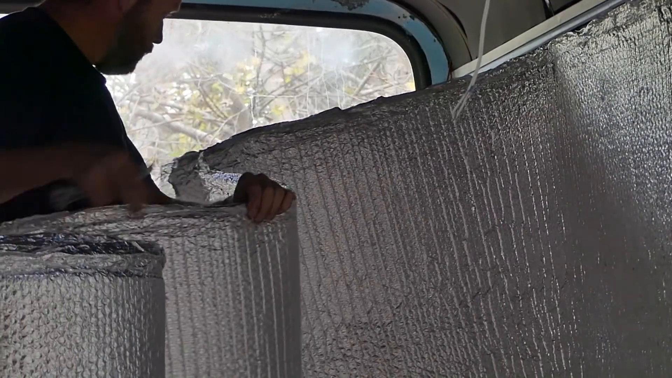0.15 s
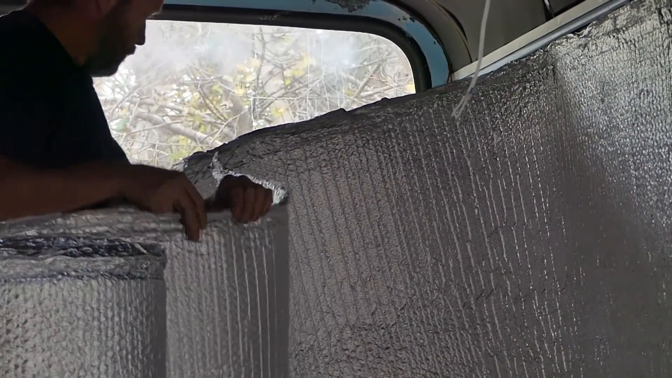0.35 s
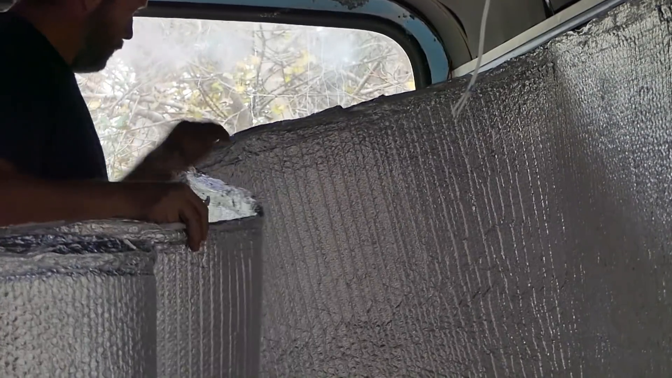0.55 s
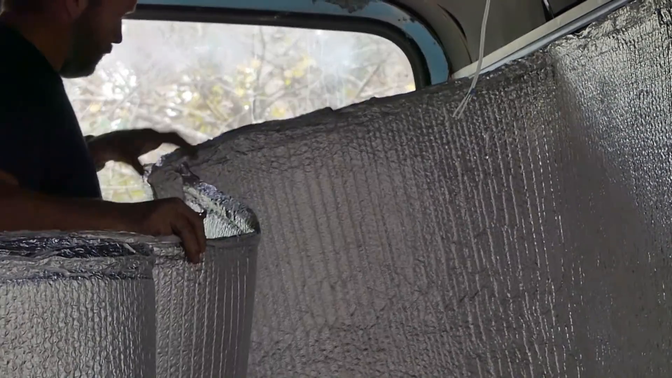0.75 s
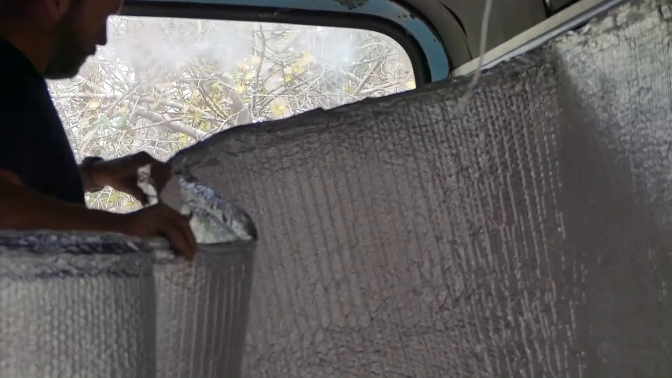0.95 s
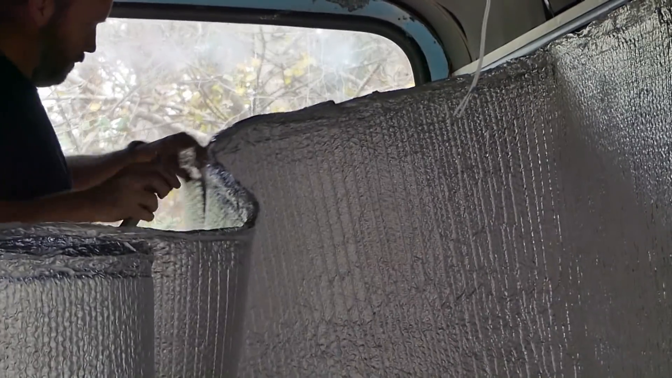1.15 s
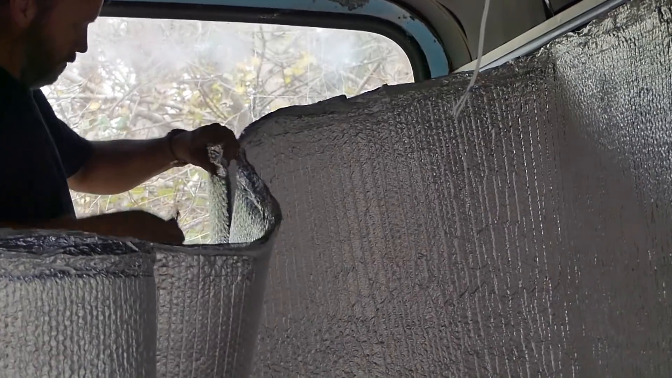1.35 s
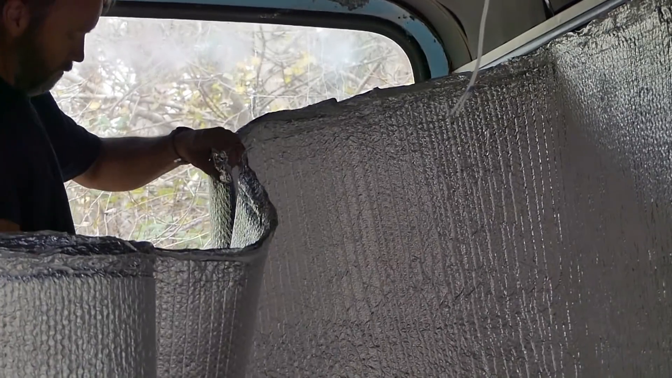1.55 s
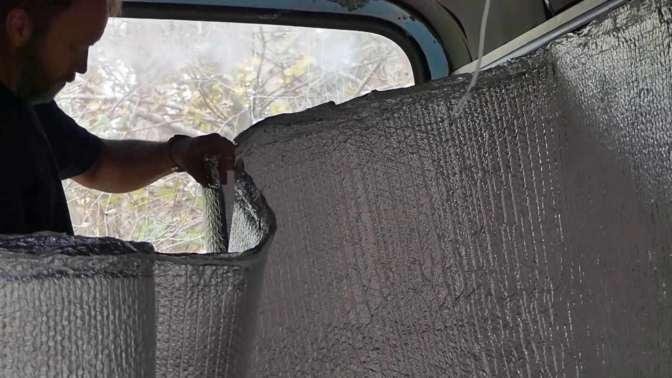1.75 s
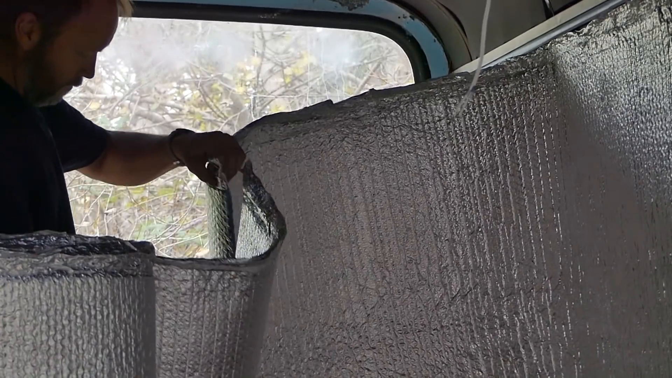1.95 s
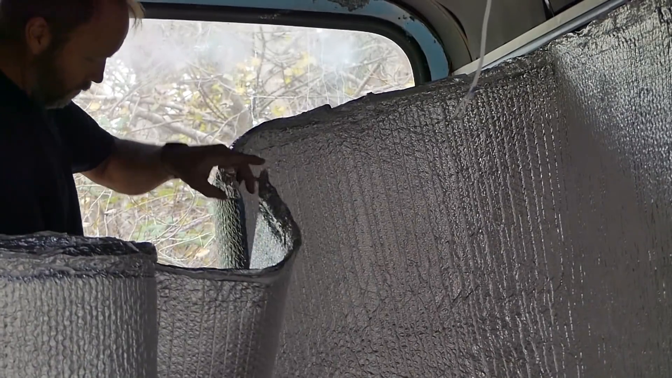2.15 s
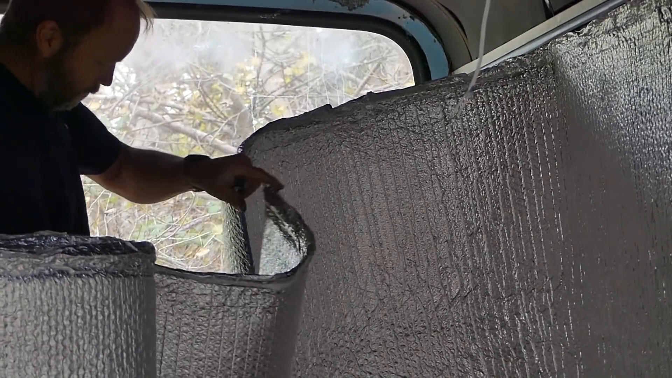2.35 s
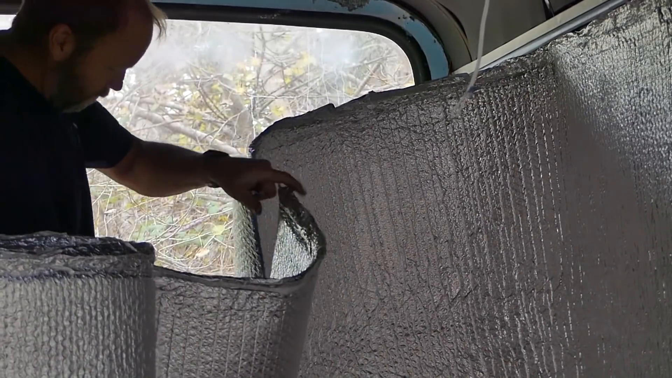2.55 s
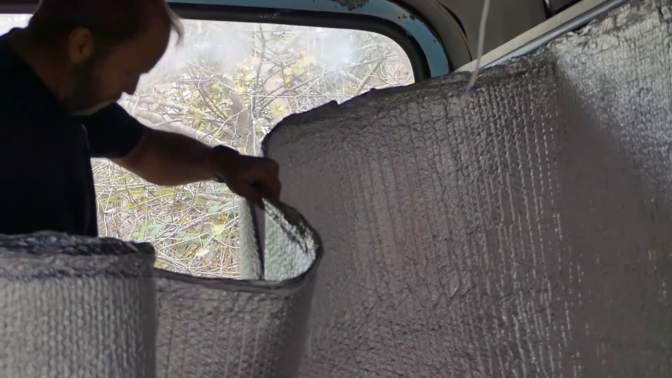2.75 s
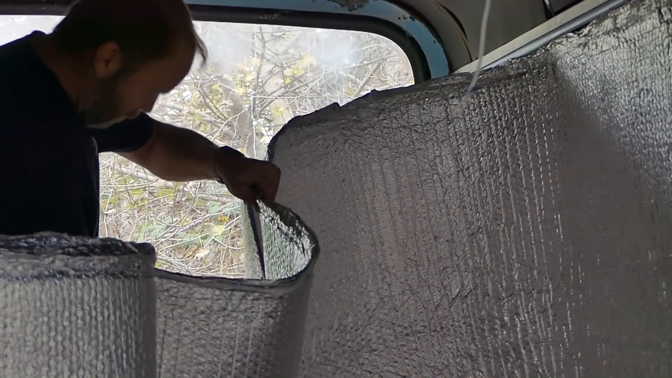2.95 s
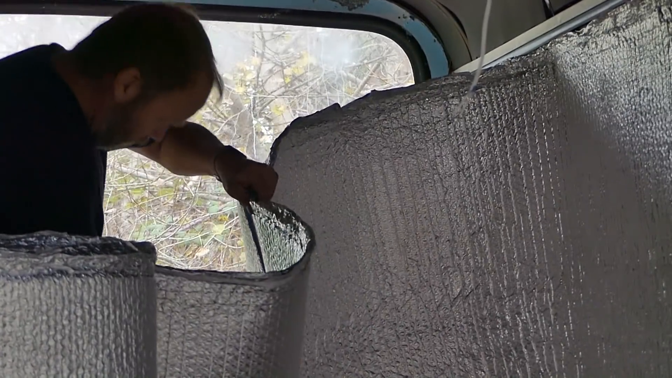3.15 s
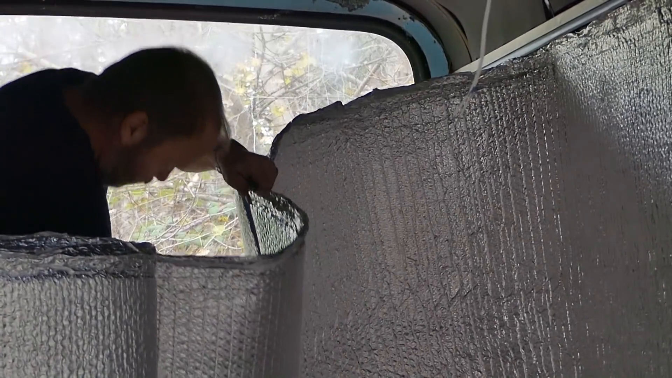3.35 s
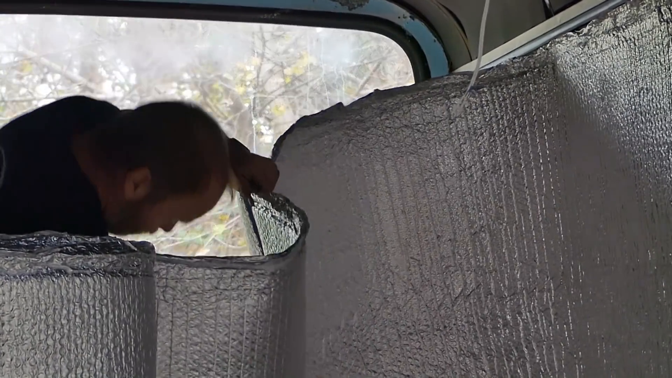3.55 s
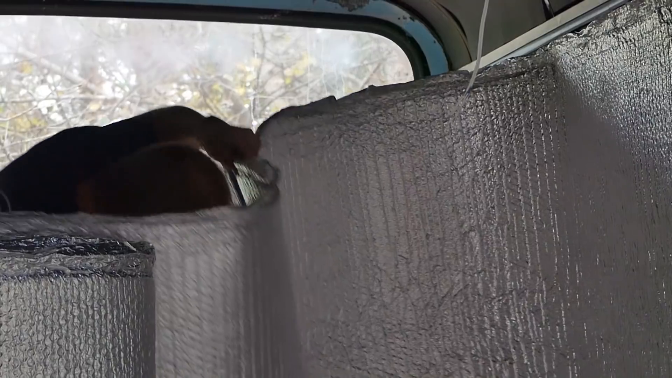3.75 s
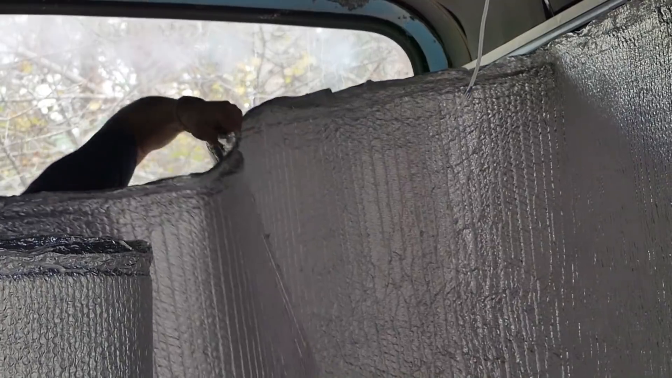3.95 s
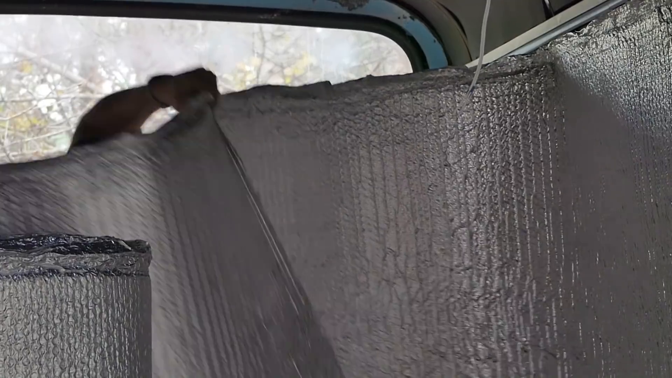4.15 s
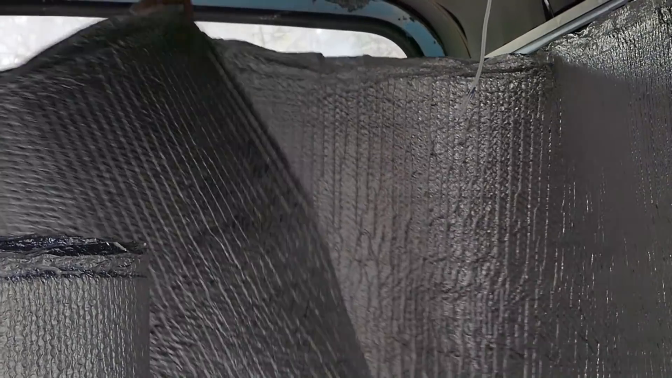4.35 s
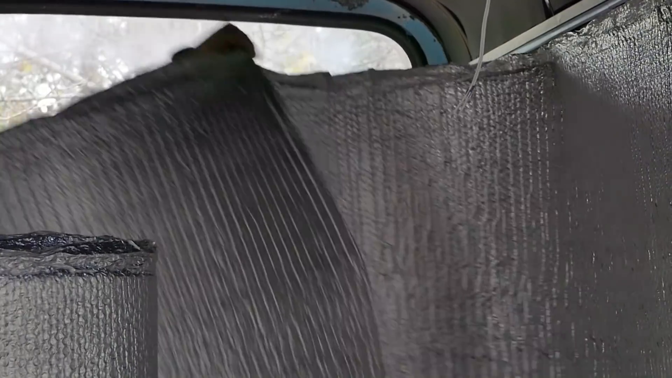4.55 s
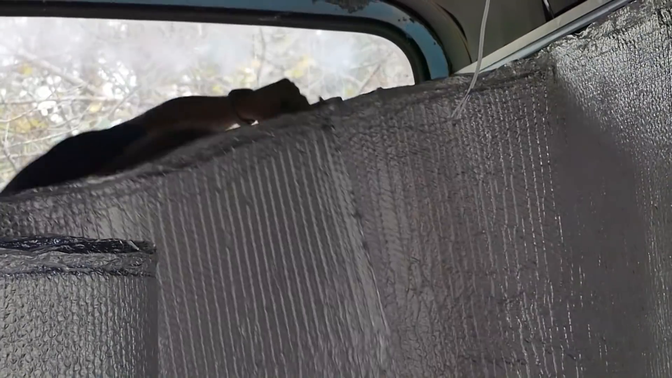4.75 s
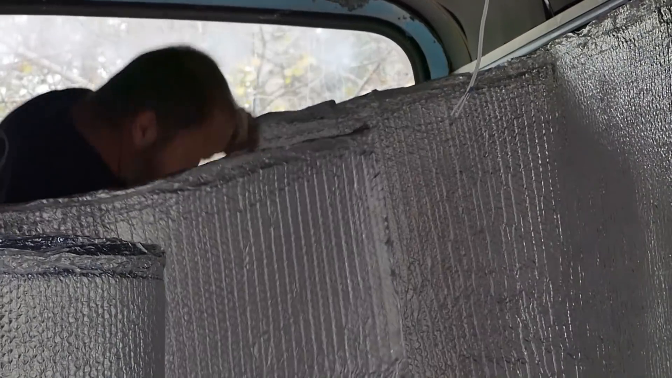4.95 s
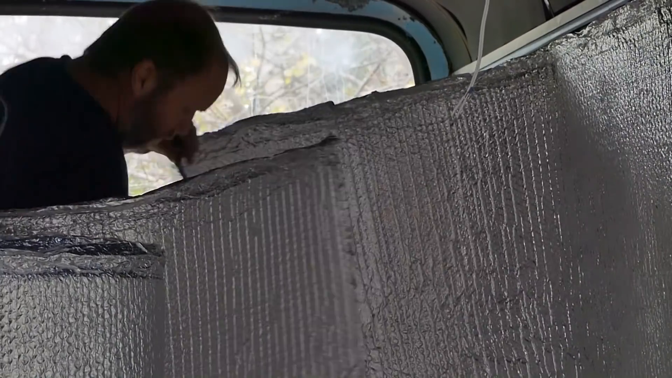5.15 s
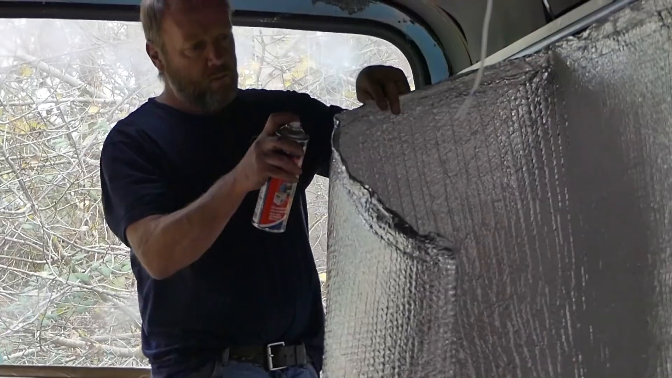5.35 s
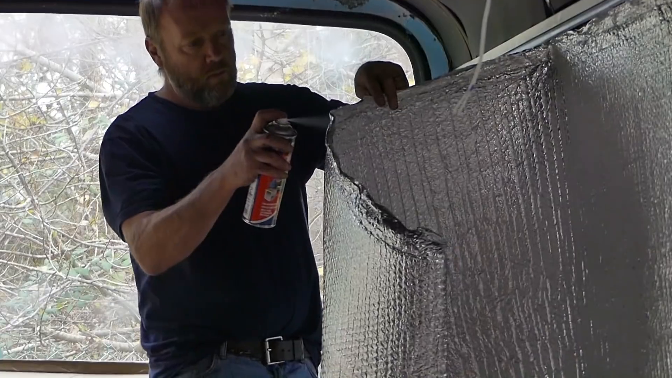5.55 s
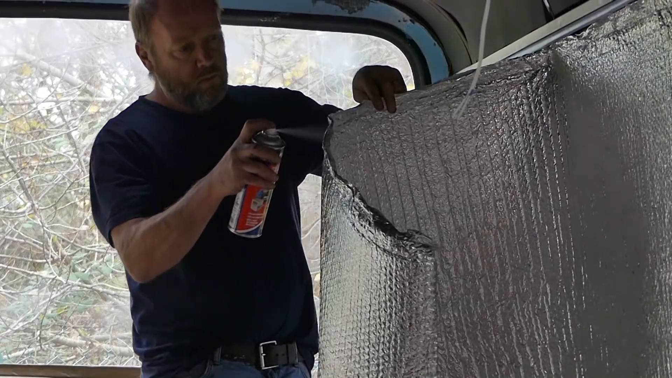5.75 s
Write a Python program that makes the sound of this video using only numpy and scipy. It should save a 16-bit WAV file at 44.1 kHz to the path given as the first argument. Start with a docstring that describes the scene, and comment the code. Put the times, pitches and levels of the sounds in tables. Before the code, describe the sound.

Inside a van, close by, hands stroke foil-faced bubble sheet: soft hissing slips, ticking wrinkles, low rustle. Midway a sharp snap opens three loud, crackling rasps with dull flaps and brief hoarse hums. Lighter rustling follows, then an abrupt cut to a smooth aerosol spray that holds to the end. Faint outdoor air lies beneath.

```python
"""Inside a van, over faint outdoor air, hands stroke a foil-faced bubble sheet against the wall.
From the start foil slips hiss, wrinkles tick and pressed bubbles rustle; soon the taut sheet hums at times,
panels buckle with dull flaps and creases snap as short ringing noise bursts.
From 3.2 s three hard drags rasp rows of bubbles over an edge, drumming the sheet and crackling the foil.
At 5.3 s an edit cuts from the handling to an aerosol can spraying smooth noise; the held sheet stirs once."""
import sys
import numpy as np
from scipy import signal
from scipy.fft import rfft, irfft
from scipy.io import wavfile
from scipy.ndimage import uniform_filter1d

SR = 44100
rng = np.random.default_rng(int(sys.argv[2]) if len(sys.argv) > 2 else 0)


def put_to_file(sound):
    """Save the sound as 16-bit audio at rate SR, in the file named by the first command-line argument."""
    columns = np.atleast_2d(sound).T  # one column per channel
    safe = np.clip(columns, -1, 1)
    whole_steps = np.round(safe * 32767)
    wavfile.write(sys.argv[1], SR, whole_steps.astype(np.int16))


N = 256220
TIME_S = np.arange(N) / SR

# Hand strokes over the sheet. Each row: start in seconds, time to release in seconds, rise in seconds,
# then relative levels in dB of foil sliding, bubbles pressed and whole sheet flexing.
STROKES = [ (-.03, .13, 0.023, -45.5, -44, -49), (0.12, 0.038, 0.029, -41, -37, -63),
           (0.18, 0.13, .04, -48, -48, -56), (0.317, 0.13, 0.17, -37, -38, -48),
           (0.463, 0.13, 0.015, -40.5, -51.5, -70), (0.602, 0.13, 0.025, -43, -42.5, -60),
           (0.706, 0.2, 0.063, -41, -35, -55.5), (0.909, 0.16, 0.069, -38.5, -35, -60),
           (1.135, 0.21, 0.045, -41.5, -52.5, -56), (1.356, 0.12, 0.046, -47.5, -47.5, -44.5),
           (1.466, 0.13, 0.044, -43, -43.5, -56), (1.62, 0.16, .03, -45, -48, -59),
           (1.735, 0.14, 0.021, -48.5, -55, -51), (1.90, 0.12, 0.066, -48, -43.5, -40.5),
           (2.021, 0.098, 0.027, -45.5, -51.5, -58), (2.162, 0.023, 0.022, -49, -56, -64),
           (2.204, 0.11, 0.087, -44, -46, -46), (2.307, 0.11, 0.077, -41, -47, -47),
           (2.454, 0.063, 0.047, -42, -54, -60), (2.596, 0.18, 0.12, -42, -48.5, -51),
           (2.756, .11, 0.059, -44.5, -41, -44), (2.863, 0.12, 0.029, -46, -67, -69),
           (2.967, 0.21, 0.068, -41, -67, -51), (3.139, 0.021, 0.034, -34, -32, -45),
           (4, 0.06, 0.04, -37.5, -34, -38), (4.364, 0.11, 0.042, -37, -42, -46),
           (4.482, 0.21, .04, -43.5, -47, -55), (4.615, 0.19, .1, -36, -46.5, -60),
           (4.82, 0.2, 0.035, -42, -47.5, -66), (5.04, .08, .04, -45, -53, -63),
           (5.107, 0.088, 0.014, -42, -44.5, -49), (5.21, 0.085, 0.054, -42, -47, -69), ]
# Hums of the taut sheet. Each row: start in seconds, time to release in seconds, level in dB,
# starting pitch in Hz.
HUMS = [(0.153, 0.034, -38.5, 360), (.79, 0.092, -43, 480), (1.039, 0.039, -37.5, 559),
        (4.255, 0.098, -31.5, 377), (4.325, 0.035, -24.5, 363), (4.40, .05, -40, 354),
        (4.689, 0.092, -33.5, 383.8)]
# Buckling panels. Each row: start in seconds, relative level in dB, upper edge in Hz, decay in seconds.
BUCKLES = [(.155, -28, 1400, 0.018), (0.718, -26, 2000, 0.018), (3.158, -23, 860, 0.018),
           (3.22, -19.5, 1000, 0.012), (3.549, -20.5, 1300, 0.019), (4.343, -14.5, 1390, 0.013),
           (4.751, -20, 490, 0.032), (5.129, -20.5, 1750, 0.017)]
# Snapping creases. Each row: start in seconds, relative level in dB, centre in Hz, decay in seconds, Q.
SNAPS = [(0.156, -39, 4260, 0.017, 1.6), (0.721, -19, 5200, 0.0035, 3.3), (0.727, -16.5, 4900, 0.007, 3.6),
         (1.042, -27.5, 10000, .008, 2.8), (1.277, -35.5, 900, 0.023, 17),
         (1.418, -26.5, 4040, 0.0052, 6.4), (1.748, -37, 11100, 0.02, 1.7),
         (1.843, -34.5, 2930, 0.013, 4.9), (2.295, -43, 5000, 0.0077, 2), (2.927, -32.5, 12700, 0.01, 3),
         (3.209, -8.5, 3330, 0.0066, 29), (3.266, -12, 3550, 0.022, 2.9), (3.344, -16, 3170, 0.078, 1.4),
         (3.559, -22, 3020, 0.0092, 1.9), (4.155, -16, 3500, 0.0061, 2), (4.32, -16, 3570, .02, 2.2),
         (4.343, -11.5, 2150, 0.0082, 3.3)]
# Hard drags along the wall. Each row: start in seconds, time to release in seconds, rise in seconds,
# then relative levels in dB of the sheet's body and the foil's crackle.
DRAGS = [(3.192, 0.27, .075, -20, -25), (3.542, 0.38, 0.048, -21.5, -24), (4.096, 0.23, 0.047, -20, -25.5)]
# Resonances of sheet and wall. Each row: centre in Hz, width in Hz, lift in dB before each layer's scaling.
SHEET_RESONANCES = [(186, 30, 4), (436, 18, 5), (499, 22, 2), (570, 26, 4.5), (744, 22, 3.5), (832, 26, 4),
                    (964, 18, 3.5), (1078, 40, 5), (1237, 35, 3.5), (1503, 24, 4), (1857, 27, 4.5),
                    (2025, 22, 6), (3270, 60, 2.5), (3362, 40, 2.5)]

# Colours of the layers. Each row: frequency in Hz, relative density in dB per Hz.
AIR_COLOUR = [(30, -22), (80, -14.5), (160, -3.5), (400, -1.5), (900, -5.5), (1700, -10), (4500, -9.5),
              (8000, -14.5), (15500, -11.5)]
SLIDE_COLOUR = [(500, -19.5), (1400, -14.5), (2000, -10), (2600, -8.5), (3100, -2.5), (4100, -1),
                (6800, -5.5), (7600, -10.5), (9800, -8), (12000, -15), (15500, -22.5)]
PRESS_COLOUR = [(30, -29), (75, -32), (130, -4.5), (265, -7.5), (350, -0.5), (490, -1), (720, -6.5),
                (1050, -6), (1500, -12), (2200, -9), (4500, -28.5)]
FLEX_COLOUR = [(25, -16), (60, -29), (90, -16), (130, 1), (210, -7.5), (300, -4.5), (600, -21)]
WRINKLE_COLOUR = [(1000, -23), (3500, -2), (7000, -5), (12000, -3), (15500, -9)]
CRACKLE_COLOUR = [(1000, -22), (1900, 2), (2700, 0), (3700, 0), (5000, -3.5), (6300, -6), (7700, -11.5),
                  (10000, -9.5), (12500, -16), (15500, -24.5)]
SPRAY_COLOUR = [(30, -48), (100, -17), (400, -12.5), (1300, -9), (1750, -3), (2350, -10), (3050, 0.5),
                (4200, -4), (6000, 0), (8000, -4), (9700, 2), (12600, 2.5), (14200, -0.5), (15600, -4)]
# Body colours, one table per drag. Each row: frequency in Hz, relative density in dB per Hz.
DRAG_COLOURS = [
    [(40, -59), (80, -40), (110, -16), (190, -6.5), (280, -11), (350, -2.5), (560, -5), (720, -6),
     (900, -12.5), (1070, -8.5), (1400, -17.5), (2200, -25), (3400, -39)],
    [(40, -25), (80, -26), (110, -6), (180, 0.5), (230, 5.5), (270, 1), (450, 4), (720, -2.5), (1000, -1),
     (1400, -8.5), (2200, -23), (3400, -36)],
    [(40, -46), (80, -16), (135, -18.5), (175, -1.5), (260, -2), (380, -2), (620, -5.5), (850, -7.5),
     (1100, -11.5), (1400, -9.5), (2100, -11), (3400, -35)],
]

# Stereo widths of air and sheet. Each row: frequency in Hz, side minus mid in dB.
AIR_SIDE = [(60, -1), (400, 7), (1500, 4.5), (4000, -12), (15000, -8)]
NEAR_SIDE = [(60, -15), (250, -21.5), (1300, -13.5), (4400, -15.5), (7500, -18.5), (9500, -8), (15000, -4)]
# Side level of the jet as audio coding leaves it, nearly mono at 3-8 kHz.
# Each row: frequency in Hz, side minus mid in dB.
CODED_JET_SIDE = [(60, -11), (1500, -11), (3100, -44), (7800, -51), (8600, -11), (15000, -8)]

STROKE_FADE_DB_PER_S, CUT_S = 154, 5.315
WRINKLES_PER_S, WRINKLE_DB = 49, -9.5
HUM_RISE_S, HUM_FADE_DB_PER_S, HUM_SAG_HZ_PER_S = 0.037, 190, 90
BODY_FADE_DB_PER_S = 176
CRACKLE_SAG_DB_PER_S, CRACKLE_FADE_DB_PER_S, CRACKLE_ARCH_DB = 8.5, 170, 1
SPRAY_START_S, SPRAY_RISE_S, SPRAY_OPENING_POWER = 5.39, 0.16, 1.42
SPRAY_DB, SPRAY_SAG_DB_PER_S = -26, 4.5
JET_ECHO_S, JET_ECHO_GAIN = 0.00272, 0.15
STIR_START_S, STIR_LENGTH_S, STIR_RISE_S, STIR_DB = 5.635, 0.052, 0.033, -38
NOTCH_HZ, NOTCH_Q, BASS_CUT_HZ, CUTOFF_HZ = 7500, 60, 60, 15650


def amp(db):
    """Amplitude ratio of a level in dB."""
    return 10 ** (np.asarray(db) / 20)


def unit(x):
    """Scales to an rms of one."""
    return x / np.sqrt(np.mean(x ** 2) + 1e-20)


def read(points, hz):
    """Interpolates a spectrum on a log-frequency axis."""
    f, value = np.transpose(points)
    return np.interp(np.log(hz + 1), np.log(f + 1), value)


def add(mix, start_s, sound):
    """Adds a sound in place, cut at the end of the mix."""
    part = mix[:, round(start_s * SR):][:, :sound.shape[1]]
    part += sound[:, :part.shape[1]]


def colour(x, gain_db, size=8192):
    """Causal minimum-phase filter of unit energy, shaped by gain_db(Hz)."""
    hz = abs(np.fft.fftfreq(size, 1 / SR))
    log_gain = np.log(amp(gain_db(hz)) + 1e-5)
    spectrum = np.exp(np.conj(signal.hilbert(log_gain)))
    taps = np.fft.ifft(spectrum).real[:size // 2]
    taps /= np.linalg.norm(taps)
    return signal.oaconvolve(x, taps[None], axes=1)[:, :x.shape[1]]


def noise():
    """Two unrelated white noises."""
    return rng.standard_normal((2, N))


def spread(pair, side_db):
    """Uses two unrelated signals as mid and side to give left and right of a set width."""
    side_gain = amp(read(side_db, np.fft.rfftfreq(N, 1 / SR)))
    side = irfft(rfft(pair[1]) * side_gain, N)
    return np.array([pair[0] + side, pair[0] - side])


def van(x, wet_db, t60_s):
    """The foil-lined cabin throws the treble back as a short, dense spray of reflections."""
    t = np.arange(SR // 4) / SR
    arrivals = (rng.random((2, len(t))) < 3000 / SR) * (t > .002)
    taps = rng.standard_normal((2, len(t))) * arrivals * amp(-60 * t / t60_s)
    taps = signal.sosfilt(signal.butter(2, 1500, "high", fs=SR, output="sos"), taps)
    taps /= np.linalg.norm(taps, axis=1, keepdims=True)
    echo = signal.oaconvolve(x, taps, axes=1)[:, :N]
    return (x + amp(wet_db) * echo) / np.hypot(1, amp(wet_db))


def sheet_db(hz):
    """Lift that the sheet's resonances give to each frequency."""
    return sum(db / (1 + (2 * (hz - f) / width) ** 2) for f, width, db in SHEET_RESONANCES)


def wander(hz):
    """Slow chance of rms one, mostly below the given rate."""
    lowpass = 1 / (1 + (np.fft.rfftfreq(N, 1 / SR) / hz) ** 4)
    return unit(irfft(rfft(rng.standard_normal(N)) * lowpass, N))


def ticks(per_s, spread_db, clump_db, clump_hz, facet_db, facet_hz):
    """Two trains of tiny slips, uneven and bunched; each bending facet favours its own pitch for a moment."""
    size = amp(spread_db * np.minimum(rng.exponential(1, N), 4))
    slips = size * (rng.random(N) < per_s / SR) * amp(clump_db * wander(clump_hz))
    signed = slips * rng.choice([-1., 1.], (2, N))
    hz, _, z = signal.stft(signed, nperseg=256, fs=SR)
    facets = uniform_filter1d(rng.standard_normal(z.shape[1:]), size=5, axis=1)
    keep = np.exp(-hz[1] / facet_hz)  # neighbouring pitches swell together
    facets = unit(signal.lfilter([1], [1, -keep], facets, axis=0))
    sound = signal.istft(z * amp(facet_db * facets), nperseg=256)[1]
    return unit(sound[:, :N])


def burst(decay_s, rise_s):
    """Noise burst that swells and dies away, its envelope peaking at one."""
    t = np.arange(SR // 3) / SR
    shape = (1 - np.exp(-t / rise_s)) * np.exp(-t / decay_s)
    return rng.standard_normal((2, len(t))) * shape / shape.max()


def swell(start_s, rise_s, sag_db_per_s=0):
    """Gain of an effort that rises linearly, then holds, with an optional steady sag from the start."""
    t = np.maximum(TIME_S - start_s, 0)
    return np.minimum(t / rise_s, 1) * amp(-sag_db_per_s * t)


def release(end_s, fade_db_per_s):
    """Gain that dies away once the effort ends."""
    return amp(-fade_db_per_s * np.maximum(TIME_S - end_s, 0))


def stroke(start_s, length_s, rise_s):
    """Gain of one hand movement: swell, hold, release."""
    return swell(start_s, rise_s) * release(start_s + length_s, STROKE_FADE_DB_PER_S)


def background():
    """Faint steady outdoor air, as coloured noise, reaches the cabin from all sides."""
    air = colour(noise(), lambda hz: read(AIR_COLOUR, hz))
    return amp(-54.5) * spread(air, AIR_SIDE)


def handling():
    """Gains of sliding, pressing and flexing; overlapping strokes add in power until the edit cut."""
    power = np.zeros((3, N))
    for start_s, length_s, rise_s, *levels_db in STROKES:
        power += np.outer(amp(levels_db), stroke(start_s, length_s, rise_s)) ** 2
    return np.sqrt(power) * (TIME_S < CUT_S)


def sliding(effort):
    """Foil brushing foil: thousands of slips merge into a grainy hiss."""
    slips = ticks(per_s=7000, spread_db=0.0, clump_db=0.06, clump_hz=45, facet_db=1.5, facet_hz=900)
    hiss = colour(slips * effort, lambda hz: read(SLIDE_COLOUR, hz))
    return amp(1.5) * spread(van(hiss, wet_db=-12.5, t60_s=0.034), NEAR_SIDE)


def pressing(effort, flex):
    """Bubbles give way under the hands and rustle in the sheet's body, over its slow flexing."""
    slips = ticks(per_s=1600, spread_db=2.2, clump_db=1.0, clump_hz=35, facet_db=2.2, facet_hz=300)
    body = colour(slips * effort, lambda hz: read(PRESS_COLOUR, hz) + 1.16 * sheet_db(hz))
    rumble = colour(noise() * flex, lambda hz: read(FLEX_COLOUR, hz))
    both = amp(-1.0) * body + amp(-3.0) * rumble
    return spread(van(both, wet_db=-6.5, t60_s=0.07), NEAR_SIDE)


def crinkling(effort):
    """Single wrinkles tick out of the sliding hiss, each with a short spray of reflections."""
    wrinkles = ticks(per_s=WRINKLES_PER_S, spread_db=0.5, clump_db=-1.0, clump_hz=10,
                     facet_db=4.5, facet_hz=1200)
    sound = colour(wrinkles * effort, lambda hz: read(WRINKLE_COLOUR, hz))
    return amp(WRINKLE_DB) * spread(van(sound, wet_db=8, t60_s=0.054), NEAR_SIDE)


def droning():
    """The taut sheet scrapes along and hums a hoarse low note that sinks as it slackens."""
    hoarse = wander(hz=62) + 1j * wander(hz=62)
    sound = np.zeros(N)
    for start_s, length_s, level_db, start_hz in HUMS:
        pitch_hz = start_hz - HUM_SAG_HZ_PER_S * (TIME_S - start_s)
        phase = 2 * np.pi * np.cumsum(pitch_hz) / SR
        note = (hoarse * np.exp(1j * phase)).real
        gain = swell(start_s, HUM_RISE_S) * release(start_s + length_s, HUM_FADE_DB_PER_S)
        sound += amp(level_db) * note * gain
    return sound


def buckling():
    """A whole panel of the sheet pops through with a dull flap."""
    sound = np.zeros((2, N))
    for start_s, level_db, edge_hz, decay_s in BUCKLES:
        def flap_db(hz):
            edges = (1 + (hz / edge_hz) ** 4) * (1 + (160 / (hz + 1)) ** 10)
            return .5 * sheet_db(hz) - 10 * np.log10(edges * (1 + hz / 700))
        add(sound, start_s, amp(level_db) * colour(burst(decay_s, rise_s=0.0064), flap_db))
    return amp(-8.5) * spread(van(sound, wet_db=-32, t60_s=0.13), NEAR_SIDE)


def snapping():
    """A crease flips over and rings briefly around its own pitch."""
    sound = np.zeros((2, N))
    for start_s, level_db, centre_hz, decay_s, q in SNAPS:
        def ring_db(hz):
            detune = hz / centre_hz - centre_hz / (hz + 1)
            return -10 * np.log10((1 + (q * detune) ** 2) * (1 + (hz / 11000) ** 4))
        add(sound, start_s, amp(level_db) * colour(burst(decay_s, rise_s=0.00013), ring_db))
    return amp(-7.0) * spread(van(sound, wet_db=-4.5, t60_s=0.16), NEAR_SIDE)


def dragging():
    """Rows of bubbles rasp over an edge: each catch drums the sheet and crackles the foil."""
    catches = ticks(per_s=3000, spread_db=1.5, clump_db=0.4, clump_hz=111.6, facet_db=0.0, facet_hz=300)
    fizz = ticks(per_s=3000, spread_db=-0.5, clump_db=-0.6, clump_hz=70, facet_db=2.0, facet_hz=897)
    skin = unit(catches + 1.33 * fizz)
    sound = np.zeros((2, N))
    for (start_s, length_s, rise_s, body_db, crackle_db), tone in zip(DRAGS, DRAG_COLOURS):
        end_s = start_s + length_s
        body_gain = swell(start_s, rise_s) * release(end_s, BODY_FADE_DB_PER_S)
        body = colour(catches * body_gain, lambda hz: read(tone, hz) + 1.33 * sheet_db(hz))
        sound += amp(body_db) * body

        progress = np.clip((TIME_S - start_s) / length_s, 0, 1)
        arch = amp(CRACKLE_ARCH_DB * np.sin(np.pi * progress))  # lifts mid-pull
        crackle_gain = swell(start_s, rise_s, CRACKLE_SAG_DB_PER_S) * release(end_s, CRACKLE_FADE_DB_PER_S)
        crackle = colour(skin * crackle_gain * arch,
                         lambda hz: read(CRACKLE_COLOUR, hz) + 0.83 * sheet_db(hz))
        sound += amp(crackle_db) * crackle
    return spread(van(sound, wet_db=-3, t60_s=0.099), NEAR_SIDE)


def spraying():
    """The valve opens slowly at first, then pressure sags; a near-wall echo combs the jet; the sheet stirs."""
    valve = swell(SPRAY_START_S, SPRAY_RISE_S) ** SPRAY_OPENING_POWER
    pressure = amp(SPRAY_DB) * release(SPRAY_START_S, SPRAY_SAG_DB_PER_S)
    jet = colour(noise(), lambda hz: read(SPRAY_COLOUR, hz)) * valve * pressure
    lag = round(JET_ECHO_S * SR)
    echo = np.pad(jet, ((0, 0), (lag, 0)))[:, :N]
    stir = colour(noise(), lambda hz: read(PRESS_COLOUR, hz))
    stir *= amp(STIR_DB) * stroke(STIR_START_S, STIR_LENGTH_S, STIR_RISE_S)
    return spread(jet + JET_ECHO_GAIN * echo + stir, CODED_JET_SIDE)


def scene():
    """Strokes, hums, flaps, snaps and drags of the sheet, then the spray, over faint air."""
    slide, press, flex = handling()
    sheet = sliding(slide) + pressing(press, flex) + crinkling(slide)
    sheet += droning() + buckling() + snapping() + dragging()
    return background() + sheet + spraying()


def record(dry):
    """The recorder has a narrow notch in the treble, a bass cut and a band limit."""
    notched = signal.lfilter(*signal.iirnotch(NOTCH_HZ, NOTCH_Q, SR), dry)
    thinned = signal.sosfilt(signal.butter(2, BASS_CUT_HZ, "high", fs=SR, output="sos"), notched)
    band_limit = signal.firwin(511, CUTOFF_HZ, window=("kaiser", 9), fs=SR)
    return signal.oaconvolve(thinned, band_limit[None], "same")


dry = scene()
out = record(dry)
put_to_file(out)
```